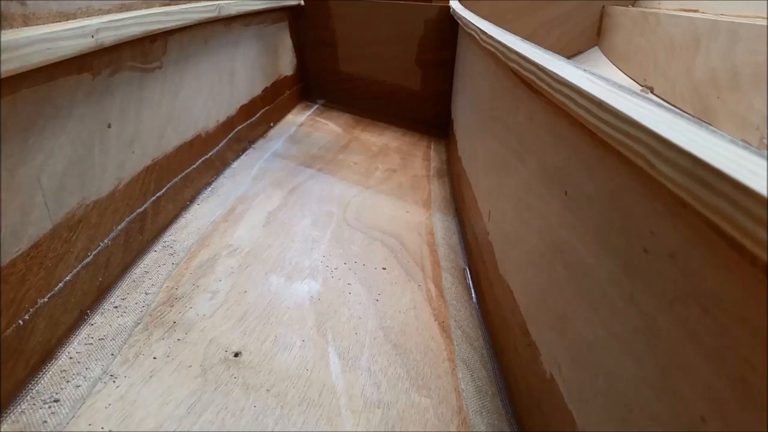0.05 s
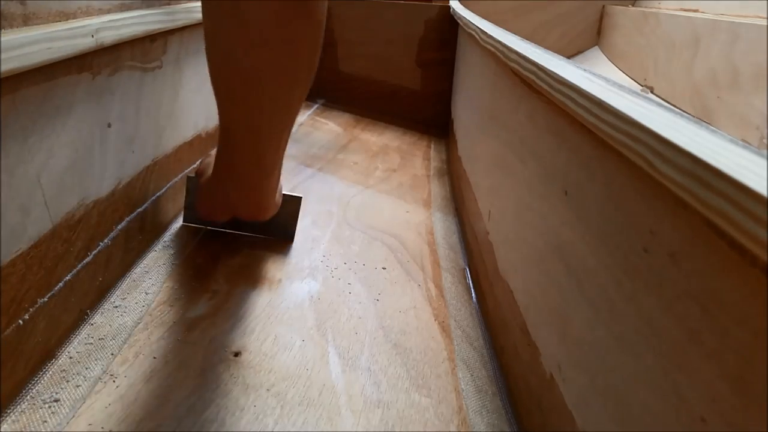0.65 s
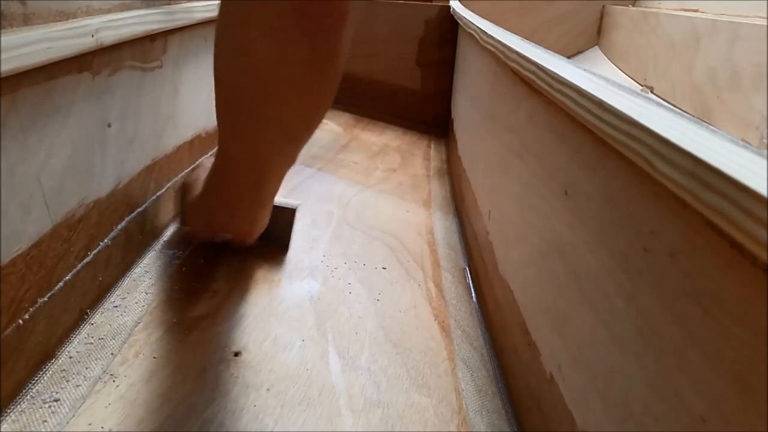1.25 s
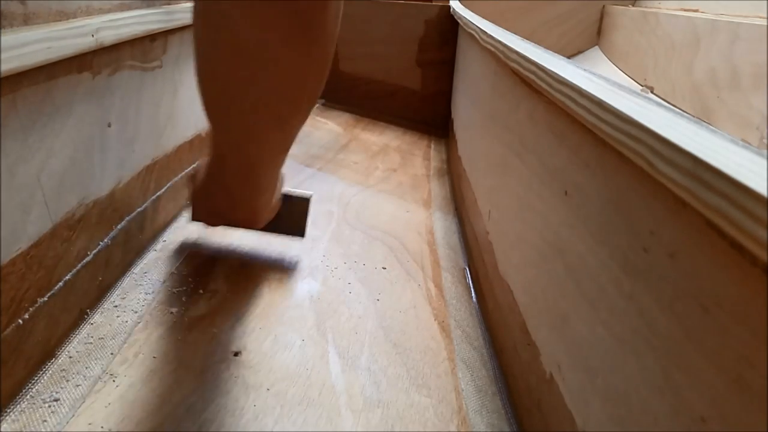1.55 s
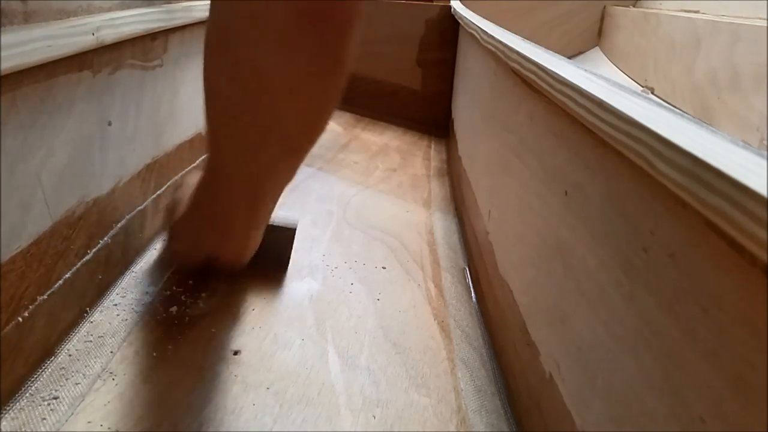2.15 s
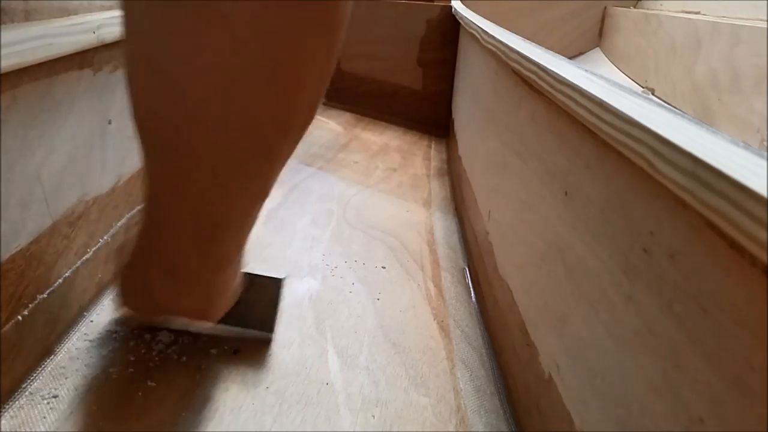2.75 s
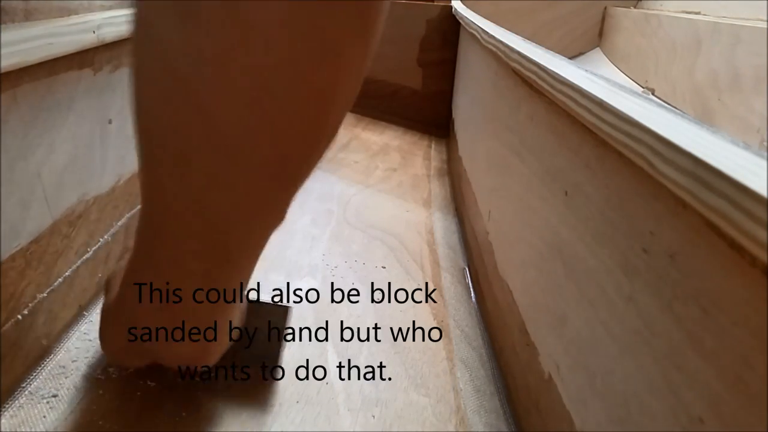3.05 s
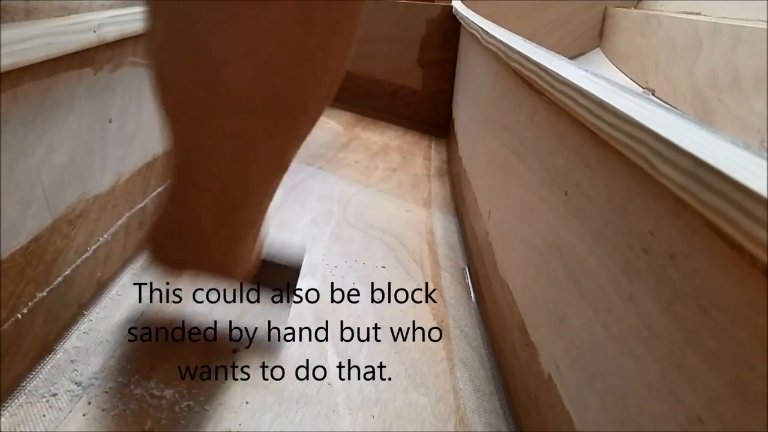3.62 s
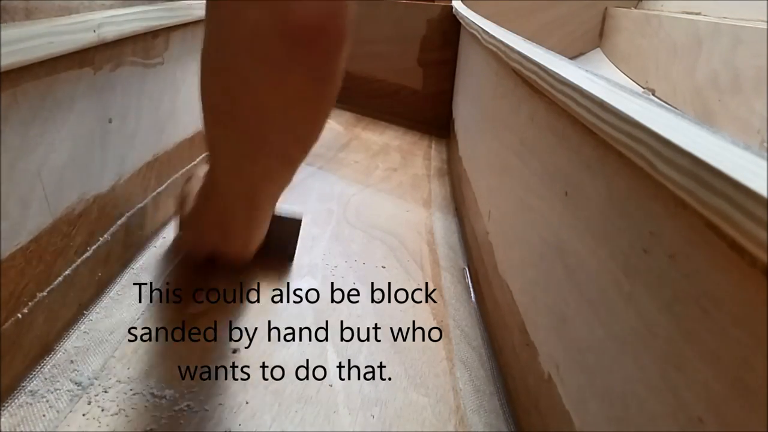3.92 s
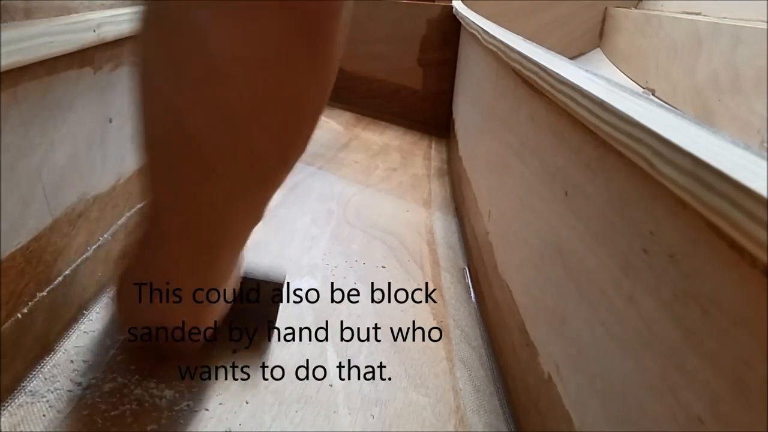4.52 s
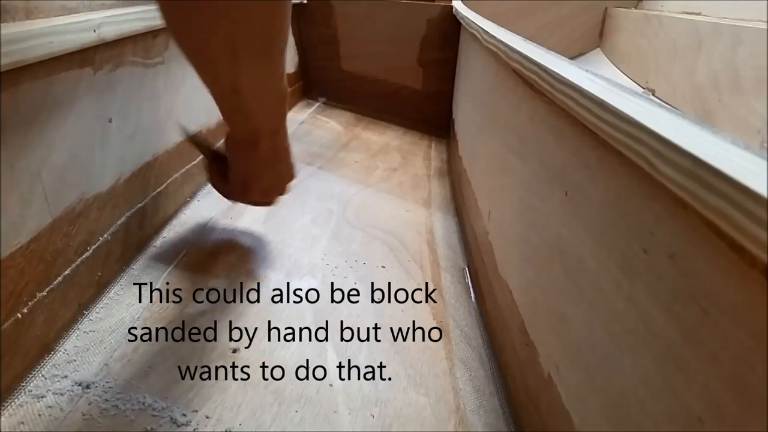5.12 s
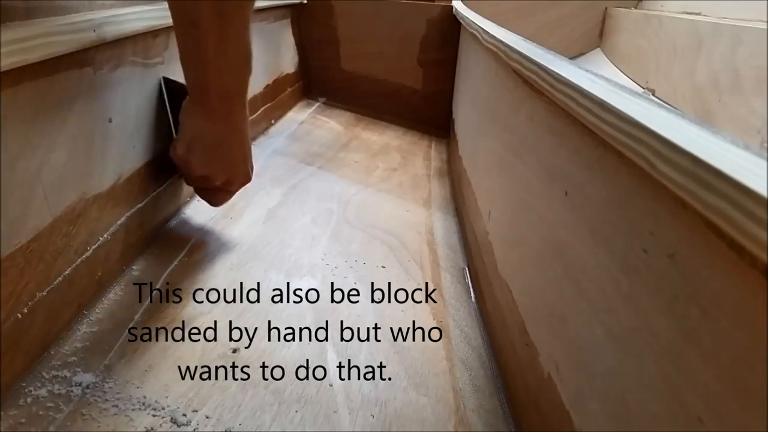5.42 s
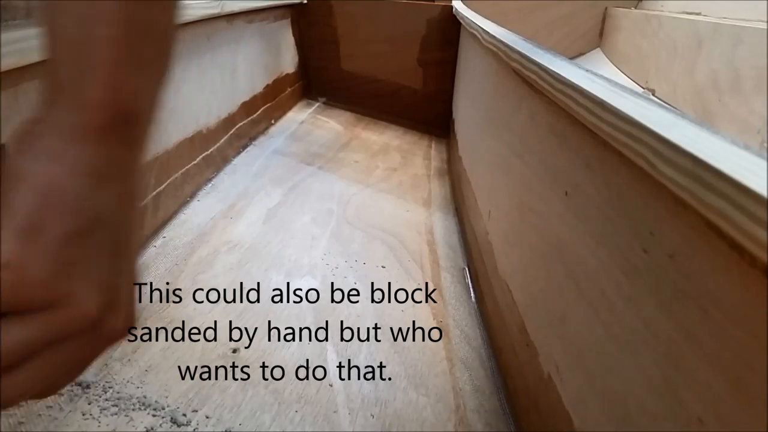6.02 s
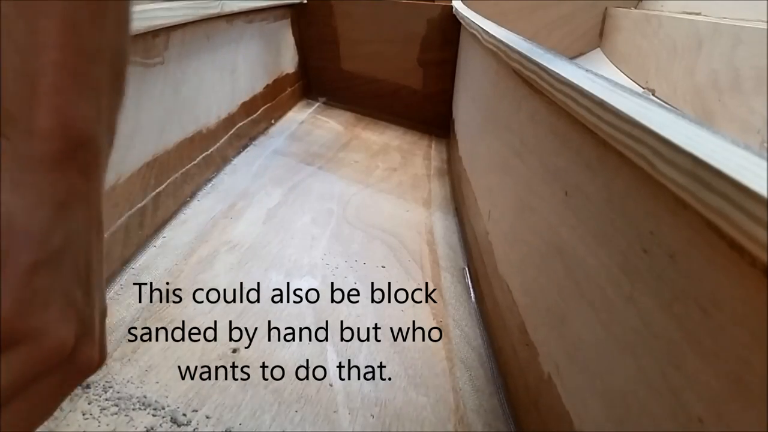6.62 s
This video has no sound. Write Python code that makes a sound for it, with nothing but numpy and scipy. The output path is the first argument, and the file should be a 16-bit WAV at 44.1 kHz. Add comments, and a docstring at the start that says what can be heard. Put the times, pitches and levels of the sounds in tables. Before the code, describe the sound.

A steel hand scraper works along hardened resin tape inside a plywood boat hull. After a brief low hum and light handling, the blade knocks down and rasps across the wood nine times in a quick, even rhythm. A short pause leads to one more stroke, then rough, short scrapes with knocks and snapping flakes close to the microphone. The hull resonates, with light workshop reverberation and a low rumble underneath.

```python
"""A steel hand scraper works along hardened glass tape inside a plywood boat hull in a workshop.
Nine times the blade is set down with a knock and a bounce, then drawn along the floor, where
stick-slip friction breaks off fine resin grains. One stroke on the side panel follows, then rough,
chipping ones close by. These forces excite the hull's resonances, and the workshop reverberates.
Beneath them lie a low rumble, faint handling sounds and, at first, a hum."""
import sys
import numpy as np
from scipy import signal
from scipy.fft import rfft, irfft
from scipy.io import wavfile
from scipy.ndimage import uniform_filter1d

SR = 44100
rng = np.random.default_rng(int(sys.argv[2]) if len(sys.argv) > 2 else 0)


def unload_audio(sound):
    """Save the sound as a 16-bit wav file, at the path given as the first command line argument."""
    columns = np.transpose(np.atleast_2d(sound))
    # keep every value between -1 and 1, then stretch to whole-number steps
    steps = np.round(np.clip(columns, -1, 1) * 32767)
    wavfile.write(sys.argv[1], SR, steps.astype(np.int16))


N = 302526
TIME = np.arange(N) / SR
SIZE = 2 ** 15  # samples in an impulse response
HZ = np.maximum(np.arange(SIZE // 2 + 1) * SR / SIZE, 1)

# coherence of left and right: (f/Hz, coherence 0-1)
COHERENCE = [(60, 0.94), (150, 0.93), (300, 0.98), (650, 0.3), (1500, 0.02), (4000, .05), (15000, 0)]
# left minus right for contacts on the floor and close by: (f/Hz, level difference/dB)
FLOOR_PAN = [(70, 4), (200, 4.5), (550, 6), (750, 3.5), (1000, 5.5), (2500, 6.5), (5500, 1.5), (8200, 11.5),
             (10300, 0), (14000, 6)]
NEAR_PAN = [(70, 1.1), (200, 7.7), (700, 2.7), (1700, 9.5), (3000, 3.8), (5500, 2.2), (8000, 16.3),
            (10300, 3.4), (14000, 7.9)]


def from_db(db):
    """Amplitude ratio of a level in decibels."""
    return 10 ** (np.asarray(db) / 20)


def at_hz(points, hz=HZ):
    """Linear interpolation on a log-frequency axis."""
    f, value = np.transpose(points)
    return np.interp(np.log(hz), np.log(f), value)


def drift(rate):
    """Random modulation: Gaussian values, rate per second, joined by straight lines."""
    knots = rng.standard_normal(8000)
    return np.interp(TIME * rate, np.arange(len(knots)), knots)


def wander(count, rate):
    """Fading of several sound paths: signed weights that drift at constant total power."""
    weights = np.array([drift(rate) for _ in range(count)])
    return weights / np.sqrt(np.sum(weights ** 2, axis=0))


def arch(start, length, peak=0.32):
    """Speed of one hand movement, 0-1: a quarter sine up from rest and another back down."""
    times = start + length * np.array([0, np.clip(peak, .1, .9), 1])
    return np.sin(np.pi / 2 * np.interp(TIME, times, [0, 1, 0]))


def through(x, response):
    """Convolution of a sound, over the time that it lasts, with a stereo impulse response."""
    x, out = np.atleast_2d(x), np.zeros((2, N + response.shape[1]))
    first, last = np.flatnonzero(x[0])[[0, -1]]
    wet = signal.fftconvolve(x[:, first:last + 1], response, axes=1)
    out[:, first:first + wet.shape[1]] = wet
    return out[:, :N]


def causal(gain):
    """Minimum-phase filter of this gain, from the folded cepstrum: no response precedes its cause."""
    cepstrum = irfft(np.log(gain + 1e-7))
    cepstrum[..., 1:SIZE // 2] *= 2
    cepstrum[..., SIZE // 2 + 1:] = 0
    return np.exp(rfft(cepstrum))


def noise(spectrum):
    """Partly coherent stereo noise of a given spectrum; the mean of the channels has rms 1."""
    hz = np.maximum(np.arange(N // 2 + 1) * SR / N, 1)
    mid, side = rfft(rng.standard_normal((2, N))) * from_db(at_hz(spectrum, hz))
    alike = np.clip(at_hz(COHERENCE, hz), 0, 1)
    out = irfft(np.sqrt(1 + alike) * mid + np.sqrt(1 - alike) * side * [[1], [-1]], N)
    return out / out.mean(axis=0).std()


def still_air():
    """Ambient noise: steady, faint and mostly bass."""
    spectrum = [(40, -6.5), (150, 3), (500, -18), (3000, -42), (15000, -46.5)]  # (f/Hz, level/dB)
    return from_db(-62) * noise(spectrum)


def rumble():
    """Structure-borne sound: the hull rumbles as weight shifts on it."""
    # envelope: (t/s, relative level/dB)
    envelope = [(0.0, -49), (0.44, -46), (0.48, -41.5), (0.74, -58), (3.63, -48), (3.88, -56), (3.95, -45),
                (4.18, -61), (4.22, -54), (4.81, -53.5), (5.5, -70.5), (5.6, -55), (6.11, -64), (6.53, -38),
                (6.59, -56), (6.86, -51)]
    # spectrum: (f/Hz, level/dB)
    spectrum = [(20, -19.5), (32, -21), (42, -1), (65, -7), (110, -5), (200, -18.5), (500, -38),
                (2000, -51)]
    return from_db(5 + np.interp(TIME, *np.transpose(envelope))) * noise(spectrum)


def hum(hz=80.7, rms_db=-35.5, hold_s=.57, fade_db_per_s=291):
    """A low tone wavers in level and phase, then decays exponentially as the work starts."""
    db = rms_db + drift(11) - fade_db_per_s * np.maximum(TIME - hold_s, 0)
    return from_db(db) * np.sqrt(2) * np.sin(2 * np.pi * hz * TIME + 0.21 * drift(6.9))


def swells(moves):
    """Envelope of small movements whose amplitude is proportional to their speed."""
    return sum(from_db(db) * arch(start, length) for start, length, db in moves)


def rustle():
    """Friction noise in light, bright clumps as the hand reaches for its place."""
    # movements: (start t/s, duration/s, relative level/dB)
    moves = [(-0.05, 0.35, -55), (0.178, 0.1, -47.5), (0.26, 0.27, -47.5), (0.338, .045, -56),
             (0.41, 0.025, -42.5), (0.52, 0.2, -52.5)]
    # spectrum: (f/Hz, level/dB)
    spectrum = [(250, -13), (800, -13), (1500, -13.5), (2600, -12), (3500, -16), (5800, -18), (7500, -3.5),
                (11400, -1.5), (14200, -4), (15500, -45)]
    clumps = from_db(3 * drift(70))
    return from_db(-2) * swells(moves) * clumps * noise(spectrum)


def handling():
    """Dull handling sounds: low noise, amplitude-modulated by the speed of each movement."""
    # movements: (start t/s, duration/s, relative level/dB)
    moves = [(-0.05, 0.39, -43.5), (0.432, 0.059, -39), (0.51, 0.19, -44), (5.305, 0.075, -55)]
    # spectrum: (f/Hz, level/dB)
    spectrum = [(70, -9), (120, 8), (180, 5.5), (300, -13), (500, -14), (1000, -21), (3000, -26),
                (15000, -75)]
    return from_db(1) * swells(moves) * noise(spectrum)


def reflections(decay):
    """Transfer function of a diffuse field: dense reflections decay exponentially, band by band."""
    t, out = np.arange(SIZE) / SR, 0
    build_up = np.sqrt(1 - np.exp(-t / 0.0013))  # the waves take a moment to spread
    centres = np.geomspace(40, 16000, 27)
    white = rfft(rng.standard_normal((2, SIZE)))
    for k, hz in enumerate(centres):
        band = np.sqrt(np.interp(np.log(HZ), np.log(centres), np.arange(len(centres)) == k))
        left, other = irfft(white * band) * build_up * from_db(-60 * t / at_hz(decay, hz))
        alike = np.clip(at_hz(COHERENCE, hz), 0, 1)
        pair = np.array([left, alike * left + np.sqrt(1 - alike ** 2) * other])
        out = out + pair * np.sqrt(np.mean(band ** 2) / np.sum(pair ** 2, axis=1, keepdims=True))
    out = rfft(out)
    # even out the colour: finely in the bass, broadly in the treble
    fine, broad = (uniform_filter1d(abs(out) ** 2, size=width) for width in (40, 200))
    treble = np.clip(HZ / 3000, 0, 1) ** 2
    power = (1 - treble) * fine + treble * broad
    right_lag = np.exp(-2j * np.pi * HZ * np.array([[0], [.00036]]))
    return out * causal((power + 1e-9) ** -.5) * right_lag


def workshop(x):
    """Reverberation: the moving source excites the room along ever different paths."""
    # reverberation time: (f/Hz, T60/s)
    decay = [(100, 0.82), (300, 0.45), (800, 0.49), (2000, 0.65), (5000, 0.67), (9000, 0.5), (14000, 0.29)]
    # spectral weighting of the reverberant sound: (f/Hz, level/dB)
    share = [(100, -7), (400, -13.5), (1200, -16), (4000, -10.5), (8000, -11.5), (14000, -15.5)]
    colour = causal(from_db(at_hz(share)))
    wall_delay = np.zeros((2, int(.014 * SR)))
    out = 0
    for weight in wander(count=4, rate=14):
        response = np.hstack([wall_delay, irfft(reflections(decay) * colour)])
        out = out + through(x * weight, response)
    return out * from_db([[0], [2.3]])  # stronger on the right


def hull(spectrum, pan, band=1):
    """Resonant filtering between the blade's edge and the listener, in stereo at unit power."""
    # resonances and a notch of hull and blade: (f/Hz, bandwidth/Hz, gain/dB)
    resonances = [(128, 80, 2.5), (180.7, 12, 2.5), (292.2, 33, 5), (390, 50, 2.5), (462.6, 56, 5),
                  (547, 74, 5.5), (1010, 36, 1.5), (1117, 77, -4), (1320, 94, 4), (1752, 50, 3),
                  (1923, 480, 2.5), (2200, 250, 0), (2800, 1100, 2.5), (3460, 34, 2.5), (10620, 1200, 5)]
    lift_db = sum(db / (1 + (2 * (HZ - hz) / width) ** 2) for hz, width, db in resonances)
    pan_db = at_hz(pan) * np.array([[.5], [-.5]])
    left, right = gain = band * from_db(at_hz(spectrum) + lift_db + pan_db)
    alike = np.clip(at_hz(COHERENCE), 0, 1)
    mid_power = (left ** 2 + right ** 2 + 2 * alike * left * right) / 4
    return causal(gain / np.sqrt(mid_power.mean()))


def touches(bounce_hardness=0.61, settle_s=0.022, settle_db=-8, settle_hz=340):
    """Inelastic impact: a first touch, a duller bounce and a thud as the hand's weight settles."""
    # blade meets wood: (t/s, level/dB, corner f/Hz, bounce delay/s, bounce level re first touch/dB)
    impacts = [(0.6796, -14, 2200, .008, -1), (0.716, -14.5, 380, .02, -12),
               (1.3197, -17.5, 2220, .008, -3), (1.758, -19, 3100, .0095, 1.5),
               (2.1871, -19.5, 2800, .011, 5), (2.6304, -22.5, 2700, .005, 5.5),
               (3.0283, -25, 2000, .011, 5), (3.4471, -18, 2320, .004, 2), (3.9384, -16.5, 2880, .009, 0),
               (4.4834, -18, 2500, .01, -17), (5.489, -32.5, 500, .012, -5.5), (5.56, -33.5, 420, .021, 6),
               (6.164, -25, 980, .011, 6.5), (6.25, -30, 420, .012, -3), (6.286, -24.5, 166, .015, -11),
               (6.381, -22.5, 1600, 0.014, -3.5), (6.5662, -21.5, 2570, .008, -9),
               (6.604, -23.5, 1900, .008, -2), (6.629, -18.5, 805, .02, -2), (6.654, -25, 300, .022, -3)]
    for s, db, corner_hz, bounce_s, bounce_db in impacts:
        yield s, db, corner_hz
        yield s + bounce_s, db + bounce_db, corner_hz * bounce_hardness
        yield s + settle_s, db + settle_db, min(corner_hz, settle_hz)


def knocks(spots, span_s=0.02):
    """Impulse response of the plywood: the softer the contact, the lower its low-pass corner."""
    # spectrum of a knock: (f/Hz, level/dB)
    spectrum = [(40, -20.5), (90, -7.5), (180, 0), (300, -3.5), (550, -2), (700, -2.5), (950, 4),
                (1200, -2.5), (1900, -3.5), (2700, -5), (5000, -13), (9000, -13), (15000, -13.5)]
    out = np.zeros((2, N + SIZE))
    for k, (s, db, corner_hz) in enumerate(touches()):
        contact = 1 / np.sqrt(1 + (HZ / corner_hz) ** 4)
        ring = irfft(spots[k % len(spots)] * hull(spectrum, FLOOR_PAN, contact))
        start = int(s * SR)
        out[:, start:start + SIZE] += from_db(db) * np.sqrt(span_s * SR) * ring  # db: rms over span_s
    return out[:, :N]


def fractures(per_s, spread_db):
    """Poisson process: resin grains break at random moments with uneven sizes; rms 1."""
    sizes = from_db(spread_db * np.minimum(rng.exponential(1, N), 4)) * rng.choice([-1, 1], N)
    clicks = sizes * (rng.random(N) < per_s / SR)
    return clicks / clicks.std()


def chips(paths, t60=0.0062):
    """Brittle fracture: each flake snaps off under the edge in a short, bright shower of cracks."""
    # flakes: (t/s, relative peak level/dB)
    flakes = [(0.818, -22.5), (0.847, -15.5), (5.4879, -39), (6.2267, -19.5), (6.2504, -39),
              (6.2874, -22.5), (6.302, -19.5), (6.3785, -10), (6.3905, -12), (6.4343, -9.5), (6.444, -20),
              (6.461, -18), (6.479, -10), (6.4878, -13), (6.547, -16.5), (6.5665, -28), (6.5974, -29),
              (6.7557, -16.5), (6.7702, -20), (6.777, -25), (6.796, -12)]
    # spectrum of a crack: (f/Hz, level/dB)
    spectrum = [(800, -20), (2500, 0.5), (5500, -6.5), (7500, -1), (11000, 0.5), (15000, -4)]
    shower = sum(from_db(db - 60 * np.abs(TIME - s) / t60) * (TIME >= s) for s, db in flakes)
    cracks = from_db(-0.5) * shower * fractures(per_s=8500, spread_db=3)
    return through(cracks, irfft(paths * hull(spectrum, NEAR_PAN)))


def stroke_levels(strokes, judder_power, rasp_power, hiss_power, judder_growth_db):
    """Power laws: the amplitudes of judder, rasp and hiss each follow a power of the blade's speed."""
    steadiness = 0.6  # the arm holds its pace: more flattens the swell
    ease_at, ease_db, ease_s = 0.87, -5.5, 0.018  # the hand eases off from this share of the stroke on
    judder, rasp, hiss = np.zeros((3, N))
    for start, length, peak, db, hiss_db, judder_db in strokes:
        speed = np.tanh(steadiness * arch(start, length, peak)) / np.tanh(steadiness)
        progress = np.clip((TIME - start) / length, 0, 1)
        cut_db = db + ease_db * np.clip((progress - ease_at) * length / ease_s, 0, 1)
        judder += from_db(db + judder_db + judder_growth_db * progress ** 2) * speed ** judder_power
        rasp += from_db(cut_db) * speed ** rasp_power
        hiss += from_db(cut_db + hiss_db) * speed ** hiss_power
    return judder, rasp, hiss


def scrape(spots, levels, spectrum, pan, grains, catch_db, catch_rate, grit_db,
           judder_db, rasp_db, hiss_db):
    """Stick-slip on the weave: breaking grains shake the panel (judder, rasp) and hiss at the blade."""
    force = grains * from_db(catch_db * drift(catch_rate))
    force = force / force.std()
    weights = wander(count=len(spots), rate=12)  # paths through the hull change as the blade travels
    low = 1 / (1 + (HZ / 400) ** 6)
    high = 1 / (1 + (4000 / HZ) ** 8)
    judder, rasp, hiss = levels
    hiss = hiss * from_db(grit_db * drift(140))  # a quick, random flicker in level sounds gritty
    out = np.zeros((2, N))
    for level, band in [(from_db(judder_db) * judder, low),
                        (from_db(rasp_db) * rasp, (1 - low) * (1 - high)),
                        (from_db(hiss_db) * hiss, high)]:
        colour = hull(spectrum, pan, np.sqrt(band))
        for paths, share in zip(spots, weights):
            out += through(force * level * share, irfft(paths * colour))
    return out


def side_scraping(spots):
    """Forced vibration of the side panel: one stroke of dense grains, its judder dying down."""
    # stroke: (start t/s, duration/s, fastest at share, rasp level/dB, hiss and judder re rasp/dB)
    strokes = [(5.556, 0.27, 0.56, -20, -6.5, 0.0048)]
    # spectrum of the contact: (f/Hz, level/dB)
    spectrum = [(29, -58), (50, -28), (256, 1.5), (341, -10), (394, -1), (551, -7.5), (622, -9), (829, -3),
                (1080, -16.5), (1790, -16.5), (5520, -24), (10800, -26), (14400, -26.5), (15500, -70)]
    # left minus right: (f/Hz, level difference/dB)
    pan = [(70, 1.1), (230, 7.4), (450, 4.6), (750, 1.6), (1100, 4.4), (2400, 4.2), (4000, 0.5),
           (8000, 8.5), (10300, 1), (14000, 5)]
    levels = stroke_levels(strokes, judder_power=0.096, rasp_power=1.2, hiss_power=1.13,
                           judder_growth_db=-12.5)
    return scrape(spots, levels, spectrum, pan, fractures(per_s=15000, spread_db=3),
                  catch_db=2.5, catch_rate=180, grit_db=3.7, judder_db=-2, rasp_db=2.5, hiss_db=-1.4)


def near_scraping(spots):
    """Impulsive excitation close by: sparser, more uneven fractures make short strokes rough."""
    # strokes: (start t/s, duration/s, fastest at share, rasp level/dB, hiss and judder re rasp/dB)
    strokes = [(6.172, 0.11, 0.6, -30, -15, 7), (6.377, 0.054, 0.34, -23.5, -13, 3.5),
               (6.425, 0.078, 0.28, -23.5, -9, 1.5), (6.497, 0.078, 0.77, -30.5, -6, 3),
               (6.565, 0.082, 0.49, -18.5, -18.5, 1.5), (6.752, .17, 0.58, -18, -4, -0.5)]
    # spectrum of the contact: (f/Hz, level/dB)
    spectrum = [(29, -54), (50, -10.5), (134, -22), (201, 0), (349, -7), (394, 1), (525, -7.5), (1030, -9),
                (1110, -11.5), (1700, -14.5), (5260, -32.5), (10800, -32.5), (14400, -37), (15500, -65)]
    levels = stroke_levels(strokes, judder_power=0.47, rasp_power=0.66, hiss_power=0.9,
                           judder_growth_db=-2)
    return scrape(spots, levels, spectrum, NEAR_PAN, fractures(per_s=3000, spread_db=5),
                  catch_db=2, catch_rate=120, grit_db=1, judder_db=3, rasp_db=1.3, hiss_db=-3)


def floor_scraping(spots):
    """Forced vibration of the floor: a light drag, then nine strokes, the judder growing in each."""
    # strokes: (start t/s, duration/s, fastest at share, rasp level/dB, hiss and judder re rasp/dB)
    strokes = [(0.725, .095, 0.14, -30.5, -29, 3.5), (0.826, 0.25, 0.51, -19, -5.5, -7),
               (1.33, 0.25, 0.58, -20.5, -2, -7.5), (1.776, 0.22, 0.59, -18.5, -3, -9),
               (2.218, 0.25, 0.48, -16.5, -5, -9.5), (2.645, 0.21, 0.56, -18.5, -4, -8.5),
               (3.048, 0.2, 0.63, -18.5, -5.5, -8.5), (3.472, 0.22, 0.53, -16.5, -7.5, -10.5),
               (3.96, 0.33, 0.55, -17, -5.5, -13), (4.5, 0.33, 0.48, -17, -5.5, -13.5)]
    # spectrum of the contact: (f/Hz, level/dB)
    spectrum = [(29, -37.5), (50, -18.5), (183, -1.5), (325, -9.5), (455, -3), (489, -10.5), (551, -2.5),
                (668, -9), (935, 1), (1160, -7.5), (1880, -8.5), (5660, -22.5), (10600, -20),
                (14400, -21.5), (15500, -59.5)]
    levels = stroke_levels(strokes, judder_power=0.38, rasp_power=0.76, hiss_power=1.47,
                           judder_growth_db=13)
    return scrape(spots, levels, spectrum, FLOOR_PAN, fractures(per_s=4500, spread_db=3),
                  catch_db=0.9, catch_rate=150, grit_db=0, judder_db=-2.5, rasp_db=-2, hiss_db=-1.5)


def scene():
    """Superposition of the work in the hull, its reverberation in the room and the background."""
    # decay time of the hull: (f/Hz, T60/s)
    hull_decay = [(100, 0.27), (250, 0.15), (600, 0.13), (1500, 0.053), (4000, 0.024), (12000, 0.062)]
    spots = [reflections(hull_decay) for _ in range(5)]  # paths from five points of contact
    scraping = floor_scraping(spots) + side_scraping(spots) + near_scraping(spots)
    work = scraping + knocks(spots) + chips(spots[0])
    return work + workshop(work) + rumble() + hum() + rustle() + handling() + still_air()


def record(dry):
    """Soft saturation rounds the highest peaks; an elliptic low-pass cuts the top steeply."""
    ceiling, cutoff_hz = .95, 14750
    rounded = dry / (1 + (dry / ceiling) ** 6) ** (1 / 6)
    return signal.sosfilt(signal.ellip(12, .1, 90, cutoff_hz, fs=SR, output="sos"), rounded)


dry = scene()
out = record(dry)
unload_audio(out)
```